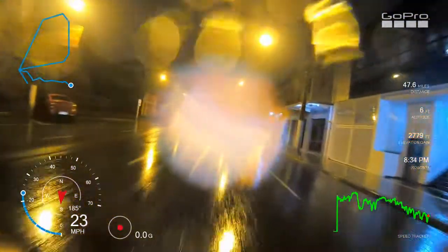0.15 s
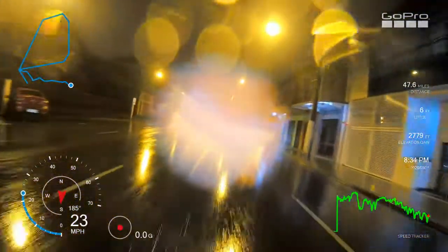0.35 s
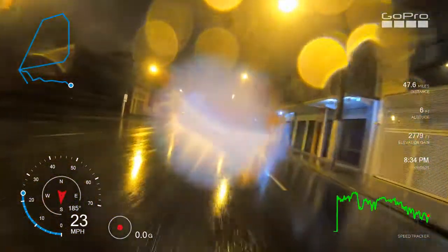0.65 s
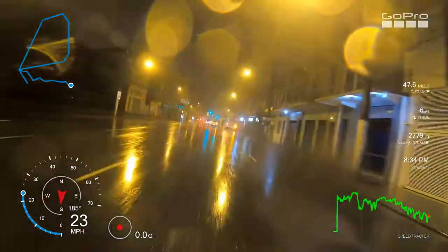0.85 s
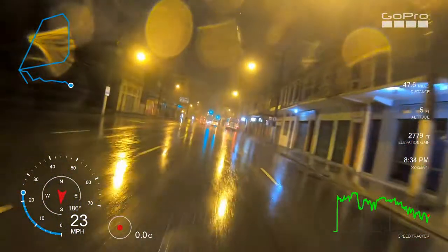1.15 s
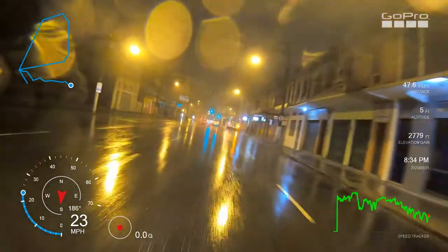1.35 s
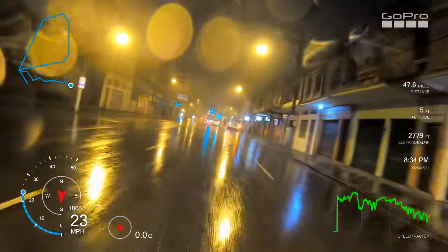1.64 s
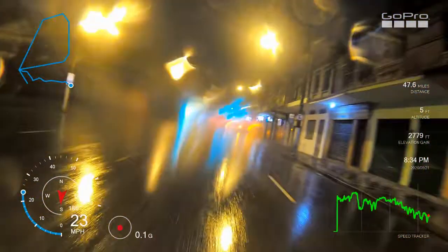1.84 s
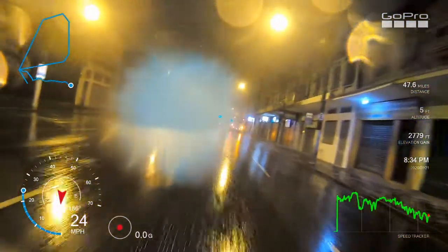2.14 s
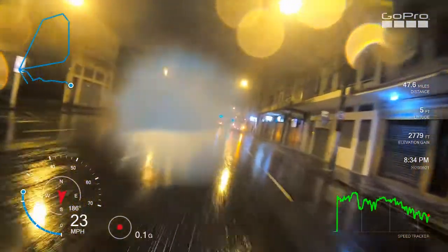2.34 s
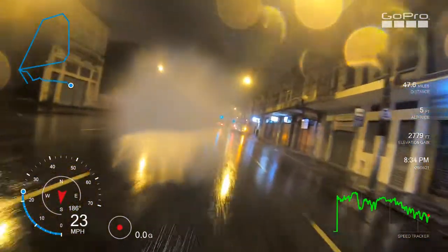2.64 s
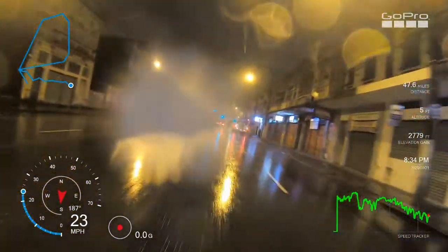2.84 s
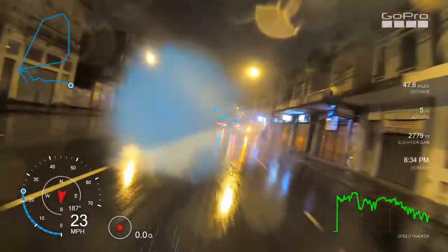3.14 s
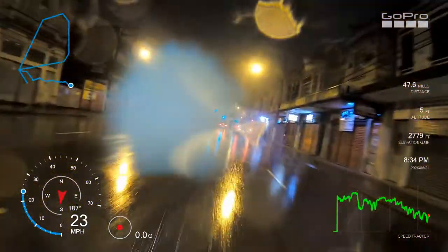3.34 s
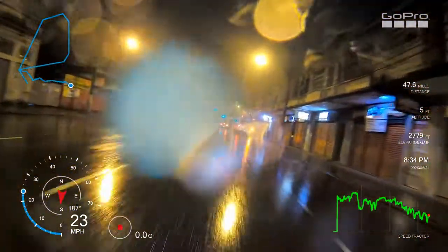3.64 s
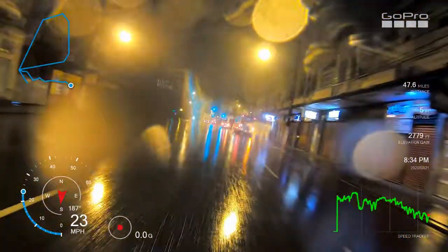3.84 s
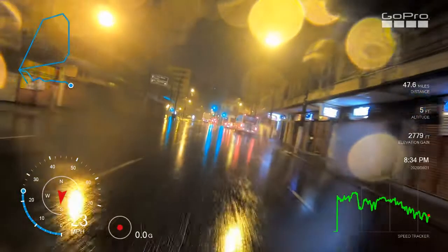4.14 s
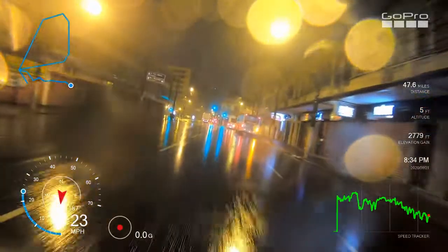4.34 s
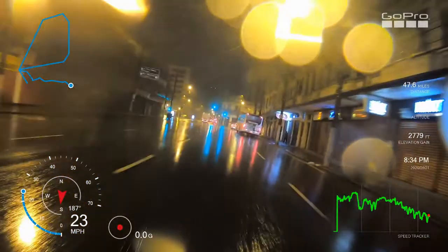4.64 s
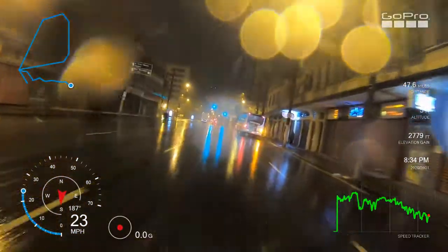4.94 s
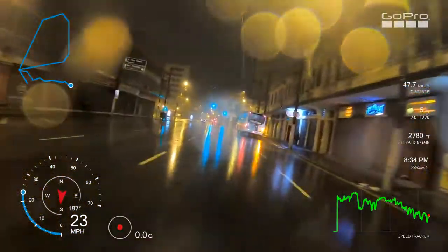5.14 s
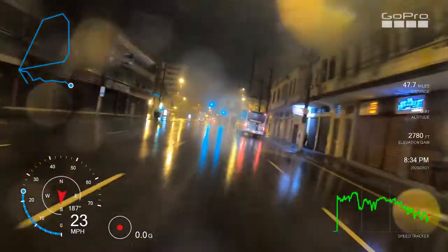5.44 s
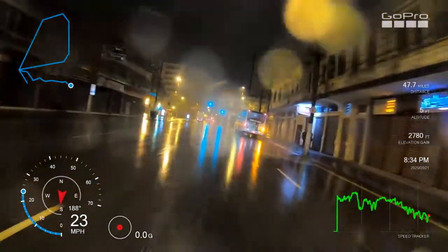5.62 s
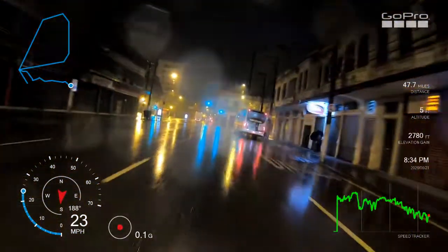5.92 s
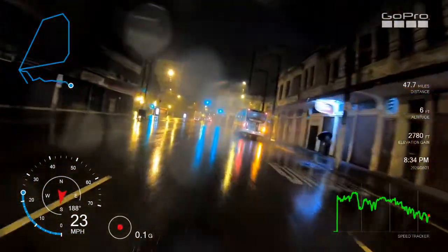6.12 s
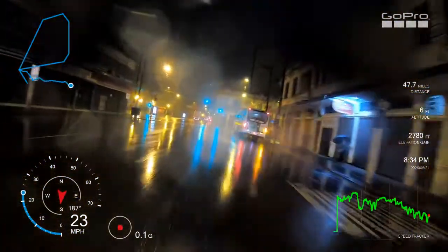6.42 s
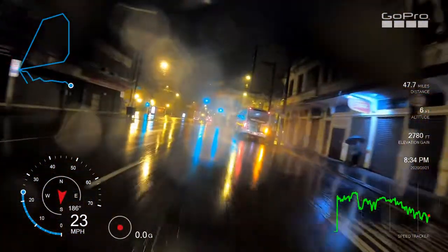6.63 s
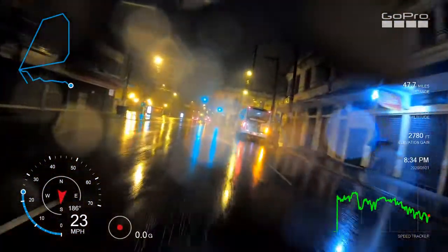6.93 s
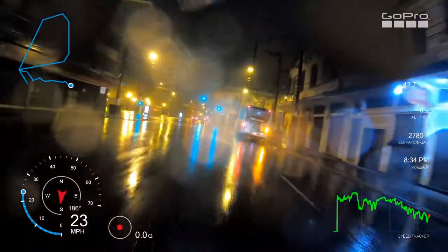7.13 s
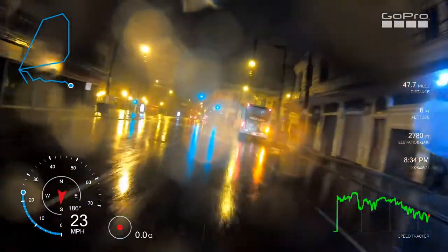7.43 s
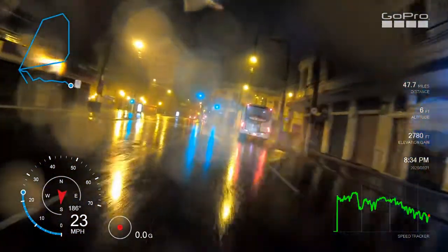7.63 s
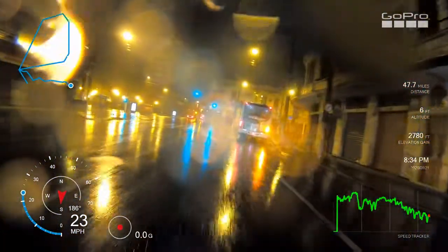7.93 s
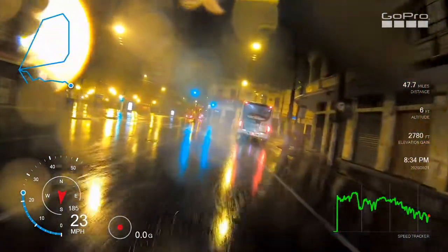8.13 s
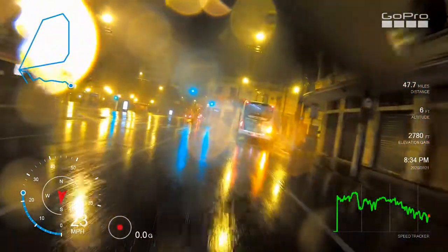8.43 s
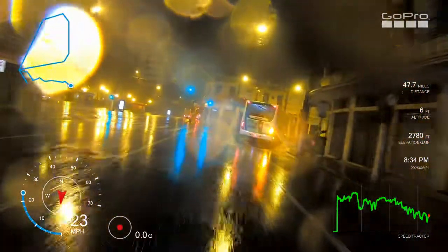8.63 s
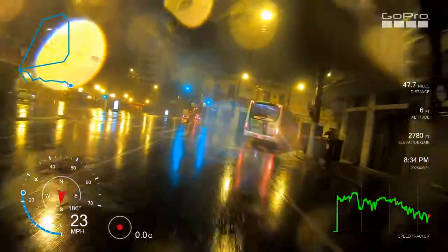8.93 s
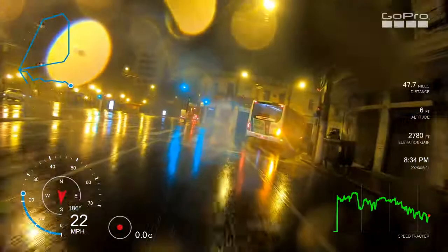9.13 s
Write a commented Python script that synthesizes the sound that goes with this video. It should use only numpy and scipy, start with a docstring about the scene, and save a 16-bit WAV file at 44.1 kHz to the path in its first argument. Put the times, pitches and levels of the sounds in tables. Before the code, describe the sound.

Close on-board sound of a twin-cylinder motorcycle on a rainy night street. From 0 to about 3.5 seconds the engine holds a low, steady, slightly wavering throb with dull mechanical clatter, over deep gusty wind rumble and a soft wet-tyre hiss. Raindrops tick and plop on the camera housing throughout, mostly before 7 seconds; a few, near 2, 3 and 3.5 seconds and later, leave a faint high fizz that glides upward and fades. Short mount knocks come near 1.4 and 2.9, with a sharper cluster at 3.9. Around 4 the throttle eases and the pitch begins sinking, the exhaust growing softer and lumpier, with light pull returning after 5. From 7.8 it lugs, thudding and missing, nearly stalling at 8.6, briefly catching, then sagging again. Tyre hiss thickens and a bright watery spray rushes up from 8.5 to the end at 9.3.

```python
"""A twin-cylinder motorcycle rolls along a wet street at night, heard from on board. Its engine is a stack of
exhaust tones plus noisy burble and clatter; the revs sink until it lugs and stumbles. The tyres are coloured
noise that hisses, then sprays in deeper water; wind is a low noise rumble. Raindrops are short rings on the
camera housing; some flood the microphone port, as noise in gliding resonances. The camera mount knocks over
bumps and under some big drops, as blows that ring its modes."""
import sys
import numpy as np
from scipy import signal
from scipy.fft import rfft, irfft, next_fast_len
from scipy.io import wavfile
from scipy.ndimage import uniform_filter1d, minimum_filter1d

SR = 44100
rng = np.random.default_rng(int(sys.argv[2]) if len(sys.argv) > 2 else 0)


def transcribe(signal):
    """Save signal, clipped to [-1, 1], as a 16-bit WAV file at the path in sys.argv[1]."""
    frames = np.atleast_2d(signal).T
    limited = np.clip(frames, -1, 1)
    pcm = np.round(limited * 32767).astype(np.int16)
    wavfile.write(sys.argv[1], SR, pcm)


N = 408807  # length in samples

# Colour of the wind rumble: pitch_hz, level_db (per Hz)
WIND_COLOUR = [(10, -8), (25, -2), (42, 0), (60, -4), (90, -10), (130, -17), (250, -33), (600, -58),
               (1500, -90)]
WIND_START_DB, WIND_RISE_DB_PER_S, GUST_DB = -30.5, 0.35, 1.5

# Tyre hiss as the road gets wetter: time_s, level_db
TYRE_LEVEL = [(0, -46.5), (2.2, -47), (3.9, -44.5), (6.1, -45), (8.3, -42), (9.27, -39)]
# Spray from deeper water: time_s, level_db
SPRAY_LEVEL = [(0, -82), (7.3, -70.5), (8.4, -60), (8.55, -50.5), (8.85, -50.5), (8.95, -41), (9.27, -39.5)]
# Colour of the tyre hiss: pitch_hz, level_db (per Hz)
HISS_COLOUR = [(300, -2.5), (800, 7.5), (1100, 3), (1600, 2.5), (2750, 1.5), (3200, -5.5), (4000, -8.5),
               (5100, -9.5), (5750, -20.5), (6700, -17.5), (8100, -26), (8800, -35), (10700, -26),
               (11800, -38), (15000, -58)]
# Colour of the spray: pitch_hz, level_db (per Hz)
SPRAY_COLOUR = [(450, -10), (900, 1.5), (1700, -1.5), (2500, 8.5), (3400, 0.5), (5000, -8.5), (7000, -6.5),
                (10400, -12.5), (11400, -23.5), (13800, -35), (15000, -58)]

# Knocks of the camera mount, some struck by a big raindrop: start_s, peak_db, dulling_db (per octave)
MOUNT_KNOCKS = [(1.428, -29, 9), (2.8595, -30, 3), (3.8725, -22, .3), (3.887, -31, 2), (3.929, -26, 5),
                (5.24, -36, 0), (6.292, -30, 12), (8.68, -31, 2)]
# Pitches at which the mount rings: pitch_hz, level_db
MOUNT_MODES = [(420, -2), (640, -1), (1000, -8), (1340, -3), (2000, -15), (3700, -11)]

# Big raindrops on the housing: start_s, ring_hz, ring_db, tick_db
BIG_DROPS = [(.2943, 2840, -51, -56), (.4115, 3360, -43.5, -56), (.6222, 6980, -56, -57),
             (.6671, 3100, -39, -52), (1.1113, 1890, -35.5, -52), (1.146, 6290, -51, -50.5),
             (1.3, 8700, -66, -56), (1.4232, 3270, -41, -51), (1.6093, 5080, -51, -57),
             (1.706, 9560, -63, -49), (1.9013, 3200, -41, -52), (2.0034, 7550, -54, -54),
             (2.0153, 2630, -39, -48), (2.4274, 9550, -62, -58), (2.4911, 8700, -62, -58),
             (2.8586, 2950, -40, -57), (3.068, 6890, -54, -62), (3.4633, 6750, -52, -54),
             (3.5891, 7920, -56, -50.5), (4.0619, 5080, -47.5, -61), (4.1934, 2970, -41.5, -59),
             (4.244, 3400, -47, -64), (4.5831, 5860, -50, -56), (4.8347, 2910, -42.5, -61),
             (5.0037, 5510, -53.5, -52), (5.0606, 6500, -56, -52), (5.5714, 1890, -41, -51),
             (5.868, 2930, -48, -53), (6.1245, 3000, -43, -64), (6.5061, 2070, -45, -50),
             (6.6985, 2700, -34.5, -47)]
RING_WIDTH_HZ = 1350  # for a ring at 2 kHz; higher rings are wider
SPLATTER_DB, SPLATTER_DECAY_S = -24, 0.004  # droplets that follow a big drop
THUMP_HZ, THUMP_WIDTH_HZ, THUMP_DB = 1100, 1800, -7  # broad thump; level relative to the ring
FINE_DROPS_PER_S = 17
# Lowest-pitched small drops; loss at the highest pitch; spread of drop sizes
FINE_DB, FINE_TREBLE_LOSS_DB, FINE_SPREAD_DB = -58, 9.5, 3.1

# Drops that flood the microphone port: start_s, fizz_db
PORT_SPLATS = [(1.9926, -60), (3.0348, -68.5), (3.5438, -65), (3.943, -63.5), (4.5831, -69.5),
               (5.5595, -63.5), (6.496, -63.5)]
# Resonances of the port: flooded_hz, clear_hz, level_db, fade_s
PORT_RESONANCES = [(5500, 6700, 0, .55), (7400, 8200, -5, .35), (9200, 10400, -4.5, .28)]
SPLAT_HZ, SPLAT_WIDTH_HZ, SPLAT_DB = 7500, 4200, -52  # smack as such a drop lands

# Engine speed: time_s, speed_hz (four-stroke cycles per second)
ENGINE_SPEED = [(0, 23.95), (.8, 24.15), (2.8, 24.23), (3.6, 24), (4, 23.1), (4.3, 23.26), (5, 22.17),
                (6.1, 20.49), (7.35, 18.31), (8, 16.8), (8.35, 16.1), (8.62, 14.6), (8.78, 17.7), (9, 17.1),
                (9.27, 15.3)]
# Throttle: time_s, load (no unit: 0 coasting, 1 cruising)
THROTTLE_LOAD = [(0, 1.38), (.7, 1.096), (2.9, 0.91), (4.2, 0.088), (4.9, 0.026), (5.5, .33), (6.3, .33),
                 (6.7, .55), (8.5, 0.5), (8.9, .03)]
CRUISE_HZ = 24  # cycles per second
FIRING_GAP = 0.375  # part of a cycle from the front firing to the rear one
# Exhaust tones: order (multiple of the cycle rate), coasting_db, cruising_db (relative to the boom)
EXHAUST_ORDERS = [(2, -13.5, -18.5), (3, -2.5, -13), (4, -18, -20.5), (5, -0.5, 2), (6, -10, -5),
                  (7, -15, -15.5), (8, -13, -6), (9, -24, -22), (10, -15.5, -6), (11, -20, -3.5),
                  (12, -32.5, -26.5), (13, -27, -3), (14, -25.5, -7.5), (16, -27.5, -6.5), (18, -29, -16.5),
                  (19, -27, -12), (21, -23, -13), (22, -28, -14.5), (24, -25.5, -7.5), (26, -27, -13.5),
                  (32, -25.5, -13.5)]
# What the silencer lets through: pitch_hz, level_db
SILENCER_PASS = [(45, -6), (54, -1.5), (65, 1.44), (120, -0.53), (170, 0.44), (200, -4), (235, -12),
                 (275, -21.5), (320, -27), (400, -29.5)]
ORDER_UNSTEADINESS = 0.13
# Colour of the clatter: pitch_hz, level_db (per Hz)
CLATTER_COLOUR = [(150, -9), (280, 9.5), (400, 4), (480, 3), (580, 4.5), (680, -1), (790, -4), (950, -19.5),
                  (1500, -34.5), (3000, -45)]
# Colour of the burble: pitch_hz, level_db (per Hz)
BURBLE_COLOUR = [(30, -24.5), (55, -14), (85, -1), (110, -1.5), (150, -2), (190, -8.5), (230, -18),
                 (290, -32.5), (500, -56.5), (1000, -100)]
# Levels at cruising speed, and how much they change for each Hz of speed lost
BOOM_DB, BOOM_LOSS_DB_PER_HZ = -15, 0.31
BURBLE_DB, BURBLE_GAIN_DB_PER_HZ = -30.5, 0.87  # combustion grows more uneven as the revs sink
CLATTER_DB, CLATTER_LOSS_DB_PER_HZ = -42.5, 0.9  # while coasting
CLATTER_LOAD_DB = 3.5  # added by cruising load
LUG_FROM_S, LUG_FULL_S, LUG_BOOM_LOSS_DB = 8.1, 9.1, 1.9
# Around 8.6 s the boom briefly gives way to burble
FALTER_S, FALTER_WIDTH_S, FALTER_BOOM_LOSS_DB, FALTER_BURBLE_DB = 8.6, 0.19, 2, 6.5
# Stumbles of the lugging engine: start_s, kick_db (hard firing), gap_depth_db (missed firing after it)
ENGINE_STUMBLES = [(7.775, -22, 4), (7.895, -18, 17), (8.005, -20, 3), (8.13, -16, 15), (8.375, -16, 2),
                   (8.505, -18, 2), (8.58, -14, 5), (8.685, -17, 5), (8.845, -25, 15)]

CUTOFF_HZ = 15700  # nothing much is heard above this


def from_db(db):
    """Turn decibels into a gain."""
    return 10 ** (np.asarray(db) / 20)


def rms_one(x):
    """Scale a sound to an average strength (rms) of 1."""
    return x / np.sqrt(np.mean(x ** 2) + 1e-20)


def in_time(rows):
    """Join the points of each column after the time by straight lines, one value per sample."""
    s, *columns = np.transpose(rows)
    return [np.interp(np.arange(N) / SR, s, column) for column in columns]


def noise(colour):
    """Shape random noise to a colour by weighting its frequencies; rms 1."""
    hz, db = np.transpose(colour)
    size = next_fast_len(N)
    bins_hz = np.arange(1, size // 2 + 2) * SR / size
    weights = from_db(np.interp(np.log(bins_hz), np.log(hz), db))
    return rms_one(irfft(rfft(rng.standard_normal(size)) * weights, size)[:N])


def drift(rate_hz):
    """Wander slowly at random, with spread 1: smoothed noise, one point every 40 samples."""
    r = np.exp(-80 * np.pi * rate_hz / SR)
    points = rng.standard_normal(N // 40 + 2002)
    slow = signal.lfilter([1], [1, -2 * r, r * r], points)[2000:]  # skip the filter's start
    return np.interp(np.arange(N) / 40, np.arange(len(slow)), rms_one(slow))


def resonator(hz, width_hz):
    """Filter coefficients of one damped resonance, with gain 1 at its peak."""
    r = np.exp(-np.pi * width_hz / SR)
    return (1 - r * r) / 2 * np.array([1, 0, -1]), [1, -2 * r * np.cos(2 * np.pi * hz / SR), r * r]


def add(out, s, sound):
    """Mix a short sound in at time s."""
    at = max(round(s * SR), 0)
    out[at:at + len(sound)] += sound[:max(N - at, 0)]


def tick(hz, width_hz):
    """A drop's impact passes through a damped resonance twice; rms 1 over 5 ms."""
    b, a = resonator(hz, width_hz)
    ring = signal.lfilter(b, a, signal.lfilter(b, a, signal.unit_impulse(440)))
    return ring / np.sqrt(np.sum(ring ** 2) / 220)


def blow(hz, width_hz):
    """A hard impact passes through a damped resonance twice; peak 1."""
    b, a = resonator(hz, width_hz)
    impact = signal.unit_impulse(SR // 10) + 1e-18
    ring = signal.lfilter(b, a, signal.lfilter(b, a, impact))
    return ring / np.abs(ring).max()


def firings(turns, depth_db, lag, front_share=0.6):
    """A swell at each of the two firings of a cycle, the rear cylinder being nearer; rms 1."""
    front, rear = (
        np.exp(5 * (np.cos(2 * np.pi * (turns - lag - at)) - 1)) for at in (0, FIRING_GAP)
    )
    return rms_one(from_db(depth_db * (front_share * front + rear)))


def wind():
    """A low, gusty rumble on the microphone that slowly grows."""
    level_db = WIND_START_DB + WIND_RISE_DB_PER_S * np.arange(N) / SR + GUST_DB * drift(0.93)
    return from_db(level_db) * noise(WIND_COLOUR)


def wet_road(turns):
    """The tyres hiss, fluttering with the firings, and throw up spray in deeper water."""
    tyre_db, = in_time(TYRE_LEVEL)
    spray_db, = in_time(SPRAY_LEVEL)
    flutter = firings(turns, depth_db=2.5, lag=0.26)
    hiss = from_db(tyre_db + 0.5 * drift(16)) * noise(HISS_COLOUR) * flutter
    return hiss + from_db(spray_db + 1.5 * drift(25)) * noise(SPRAY_COLOUR)


def mount(width_hz=350):
    """Each knock rings the mount's damped modes; dull knocks ring the high ones less."""
    out = np.zeros(N)
    lowest_hz = MOUNT_MODES[0][0]
    for s, peak_db, dulling_db in MOUNT_KNOCKS:
        for hz, mode_db in MOUNT_MODES:
            level_db = peak_db + mode_db - dulling_db * np.log2(hz / lowest_hz)
            add(out, s, from_db(level_db) * blow(hz, width_hz))
    return out


def fine_rain():
    """Small drops land at random times as short, faint ticks of random pitch and size."""
    out = np.zeros(N)
    for when, pitch, size in rng.random((int(FINE_DROPS_PER_S * N / SR), 3)):
        size_db = FINE_SPREAD_DB * min(-np.log(size), 2.8)  # many small, few large
        level_db = FINE_DB - FINE_TREBLE_LOSS_DB * pitch + size_db
        add(out, when * N / SR, from_db(level_db) * tick(2500 + 7000 * pitch, 4500))
    return out


def big_drops():
    """Big drops ring the housing, each with a thump, a sharp tick and a brief splatter."""
    out, t = np.zeros(N), np.arange(SR // 50) / SR
    tops_hz = rng.uniform(5400, 9000, len(BIG_DROPS))
    for (s, hz, ring_db, tick_db), top_hz in zip(BIG_DROPS, tops_hz):
        impact = from_db(ring_db) * tick(hz, RING_WIDTH_HZ * np.sqrt(hz / 2000))
        impact += from_db(ring_db + THUMP_DB) * tick(THUMP_HZ, THUMP_WIDTH_HZ)
        impact += from_db(tick_db) * tick(top_hz, 6000)
        # the drop bursts into droplets that land within a few ms
        droplets = rng.standard_normal(len(t)) * np.exp(-t / SPLATTER_DECAY_S)
        contact = signal.unit_impulse(len(t)) + from_db(SPLATTER_DB) * droplets
        add(out, s, np.convolve(impact, contact / np.linalg.norm(contact)))
    return out


def draining_fizz(wet_hz, dry_hz, samples, drain_s=0.22, width_hz=1200, block_size=256):
    """Noise in a resonance that a water film has lowered, gliding back up as it drains; rms 1."""
    blocks = rng.standard_normal(samples).reshape(-1, block_size)
    state, parts = np.zeros((2, 2)), []
    for index, block in enumerate(blocks):
        age_s = index * block_size / SR
        hz = dry_hz + (wet_hz - dry_hz) * np.exp(-age_s / drain_s)
        section = np.concatenate(resonator(hz, width_hz))
        part, state = signal.sosfilt([section, section], block, zi=state)
        parts.append(part)
    return rms_one(np.concatenate(parts))


def flooded_port(splash_db=4, splash_s=0.018):
    """A drop smacks onto the port, whose resonances fizz and fade, with a short splash at first."""
    out, t = np.zeros(N), np.arange(256 * 240) / SR
    for s, fizz_db in PORT_SPLATS:
        add(out, s, from_db(SPLAT_DB) * tick(SPLAT_HZ, SPLAT_WIDTH_HZ))
        for wet_hz, dry_hz, mode_db, fade_s in PORT_RESONANCES:
            fizz = draining_fizz(wet_hz, dry_hz, len(t))
            fading = np.exp(-t / fade_s) + from_db(splash_db) * np.exp(-t / splash_s)
            add(out, s, from_db(fizz_db + mode_db) * fizz * fading)
    return out


def port_membrane(x):
    """The port's membrane passes little above its own resonance."""
    return signal.sosfilt(signal.butter(8, 10800, fs=SR, output="sos"), x)


def exhaust(turns, cycle_hz, load, dispersion=40, shift=-2.01, waver_db=1.52):
    """Two unevenly spaced firings a cycle give a stack of orders; the silencer delays low ones most."""
    out = np.zeros(N)
    pipe_hz, pipe_db = np.transpose(SILENCER_PASS)
    for order, coasting_db, cruising_db in EXHAUST_ORDERS:
        pair_phase = np.angle(1 + np.exp(-2j * np.pi * order * FIRING_GAP))
        phase = 2 * np.pi * order * turns + pair_phase + dispersion / order + shift
        tone = np.sqrt(2) * np.cos(phase)
        # an open throttle sharpens the pulses
        level_db = coasting_db + (cruising_db - coasting_db) * load
        # sinking revs slide the upper orders into the silencer's pass band
        level_db = level_db + np.interp(order * cycle_hz, pipe_hz, pipe_db)
        # weak orders vary more than the boom
        unsteady = 1 + ORDER_UNSTEADINESS * np.sqrt(abs(level_db) / 10) * drift(10)
        out += from_db(level_db) * unsteady * tone
    return out * from_db(waver_db * drift(11))


def stumble(exhaust_sound, pipe_hz=160, pipe_width_hz=90, gap_after_s=0.027, gap_s=0.011):
    """One firing kicks hard, dulled by the silencer, and the next one fails."""
    kicks, dip_db, t = np.zeros(N), np.zeros(N), np.arange(N) / SR
    for s, kick_db, depth_db in ENGINE_STUMBLES:
        # start early, since the ring takes time to build up
        add(kicks, s - 1 / pipe_hz, from_db(kick_db) * blow(pipe_hz, pipe_width_hz))
        dip_db += depth_db / (1 + ((t - s - gap_after_s) / gap_s) ** 4)
    dull_kicks = signal.sosfilt(signal.butter(4, 240, fs=SR, output="sos"), kicks)
    return exhaust_sound * from_db(-dip_db) + dull_kicks


def engine(turns, cycle_hz, load):
    """Exhaust boom, burble and clatter all follow speed; exhaust and clatter also follow the load."""
    t, sag_hz = np.arange(N) / SR, CRUISE_HZ - cycle_hz
    lug = np.interp(t, [LUG_FROM_S, LUG_FULL_S], [0, 1])
    falter = np.exp(-((t - FALTER_S) / FALTER_WIDTH_S) ** 2)

    boom_db = BOOM_DB - BOOM_LOSS_DB_PER_HZ * sag_hz
    boom_db -= LUG_BOOM_LOSS_DB * lug + FALTER_BOOM_LOSS_DB * falter
    boom = from_db(boom_db) * exhaust(turns, cycle_hz, load)

    burble_db = BURBLE_DB + BURBLE_GAIN_DB_PER_HZ * sag_hz + FALTER_BURBLE_DB * falter
    burble = from_db(burble_db) * noise(BURBLE_COLOUR) * firings(turns, depth_db=0.5, lag=0.33)

    # combustion knocks hardest while the engine pulls
    knocking = firings(turns, depth_db=3.5 + 3 * load, lag=0.097)
    clatter_db = CLATTER_DB - CLATTER_LOSS_DB_PER_HZ * sag_hz + CLATTER_LOAD_DB * load
    clatter = from_db(clatter_db) * noise(CLATTER_COLOUR) * knocking
    return stumble(boom + burble) + clatter


def scene():
    """Wind, wet tyres, mount knocks, rain and engine add up at one microphone."""
    cycle_hz, = in_time(ENGINE_SPEED)
    load, = in_time(THROTTLE_LOAD)
    turns = np.cumsum(cycle_hz) / SR  # engine cycles so far
    water = port_membrane(fine_rain() + big_drops() + flooded_port())
    ride = wind() + wet_road(turns) + mount() + water + engine(turns, cycle_hz, load)
    return ride[None]


def record(dry, ceiling=0.5, release_db_per_s=60):
    """A look-ahead limiter turns peaks down and recovers slowly; the top is cut."""
    over_db = np.maximum(20 * np.log10(np.abs(dry[0]) / ceiling + 1e-9), 0)
    slope_db = release_db_per_s * np.arange(N) / SR
    held_db = np.maximum.accumulate(over_db + slope_db) - slope_db
    # act just before each peak, then smooth the gain
    gain_db = uniform_filter1d(minimum_filter1d(-held_db, size=221), size=221)
    top_cut = signal.cheby2(12, 70, CUTOFF_HZ, fs=SR, output="sos")
    return signal.sosfilt(top_cut, dry * from_db(gain_db))


dry = scene()
out = record(dry)
transcribe(out)
```